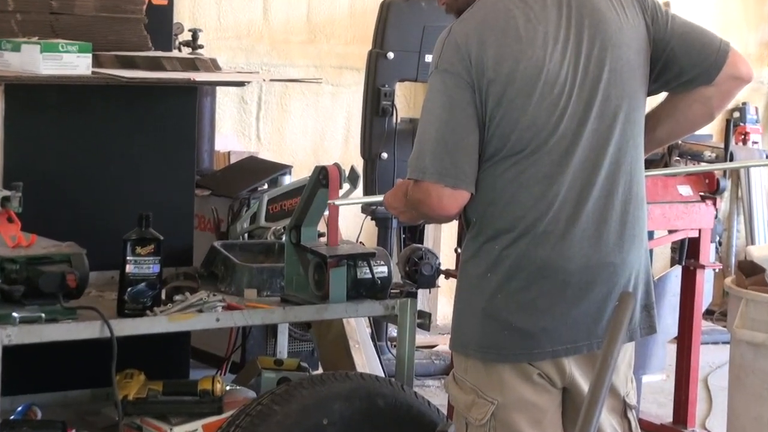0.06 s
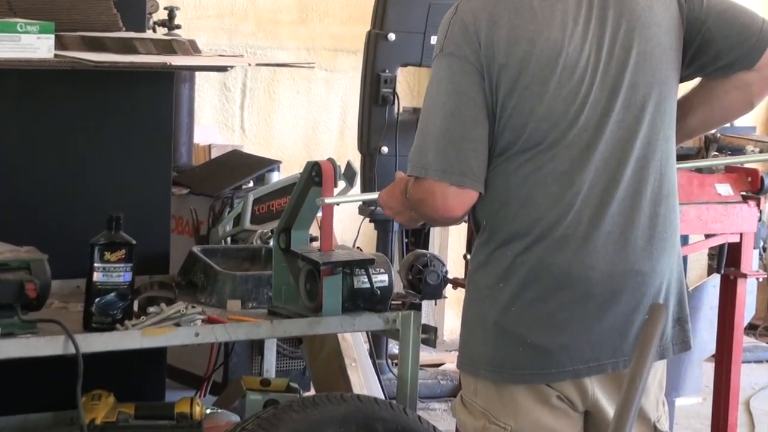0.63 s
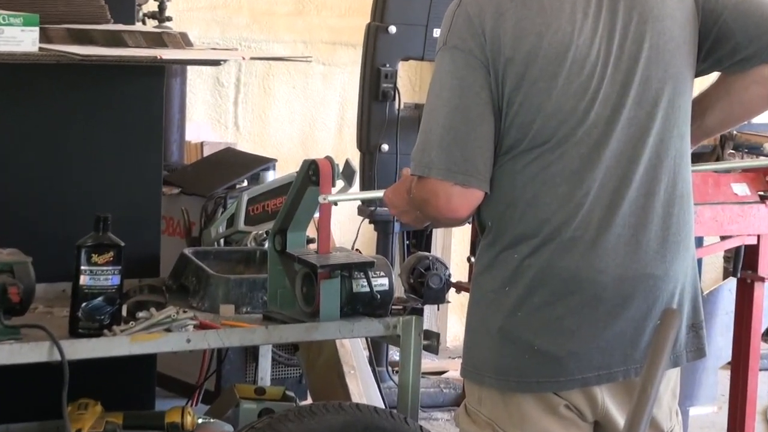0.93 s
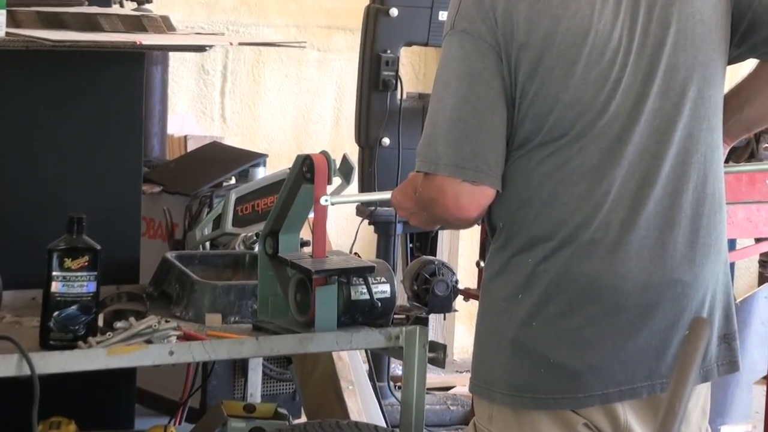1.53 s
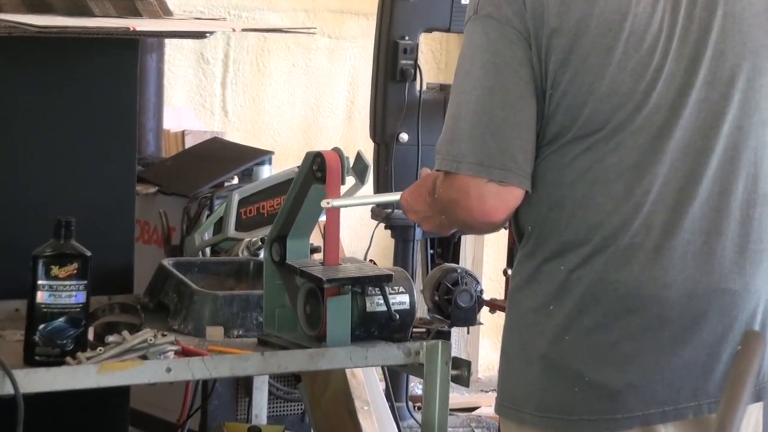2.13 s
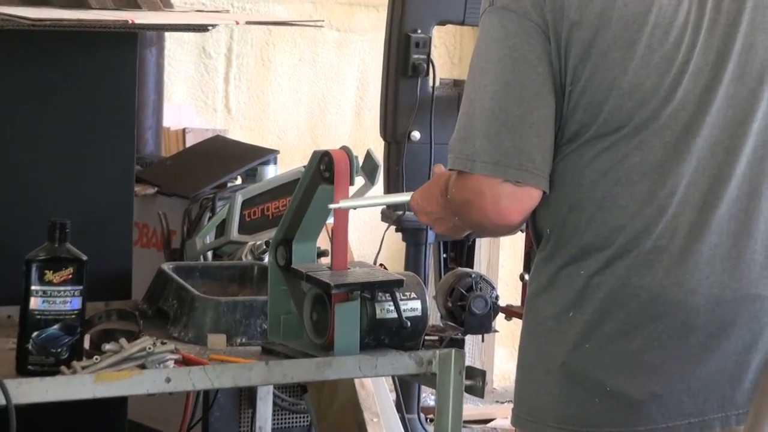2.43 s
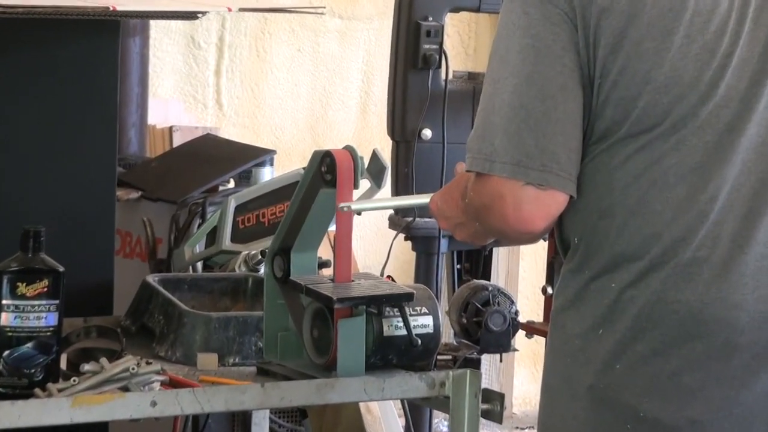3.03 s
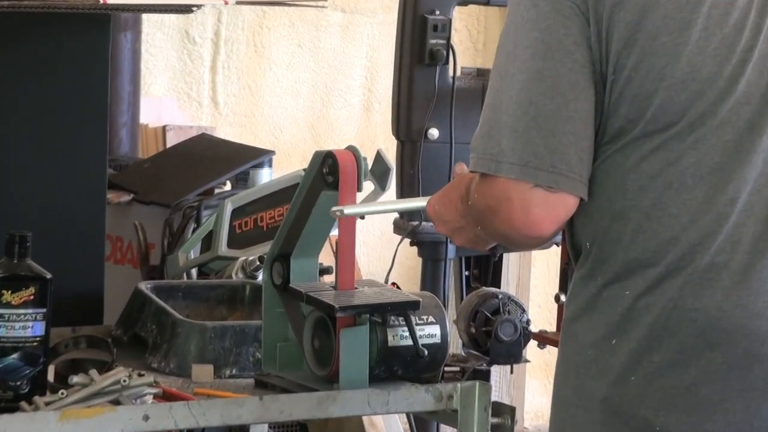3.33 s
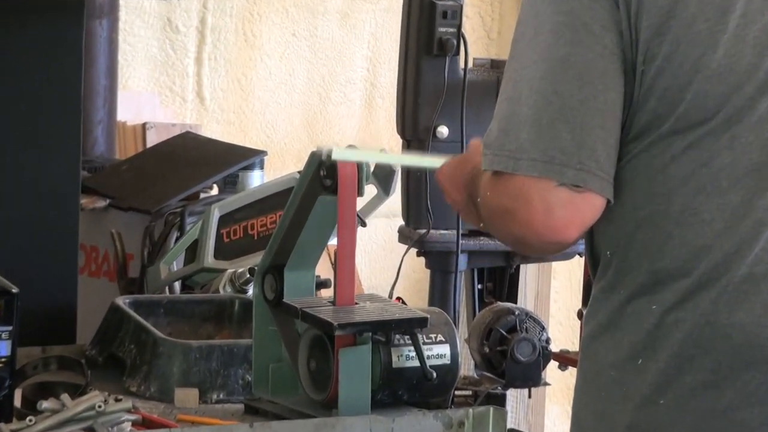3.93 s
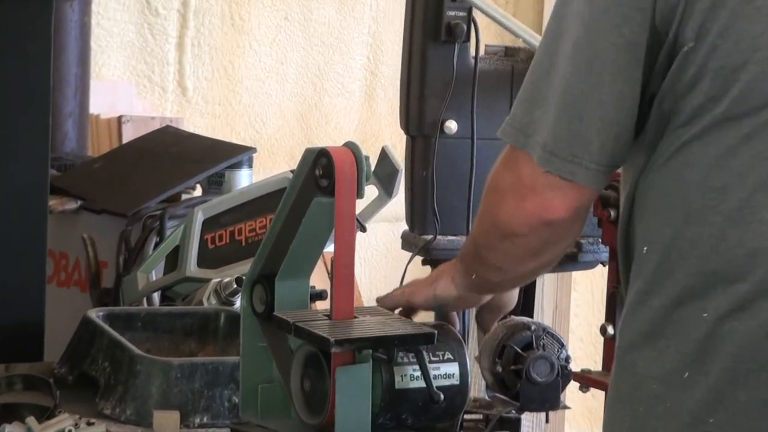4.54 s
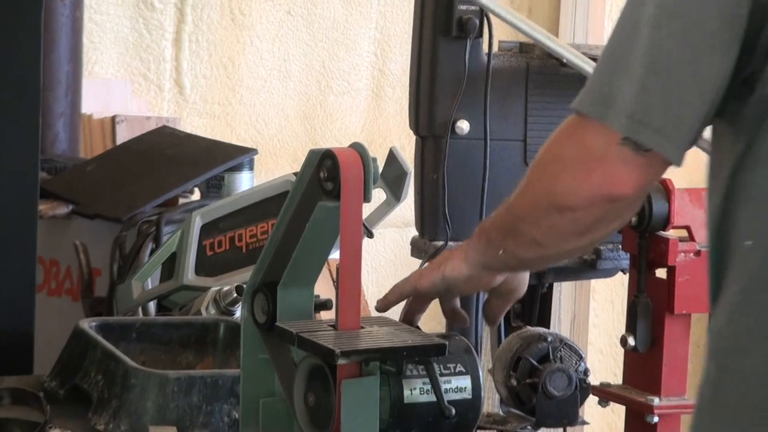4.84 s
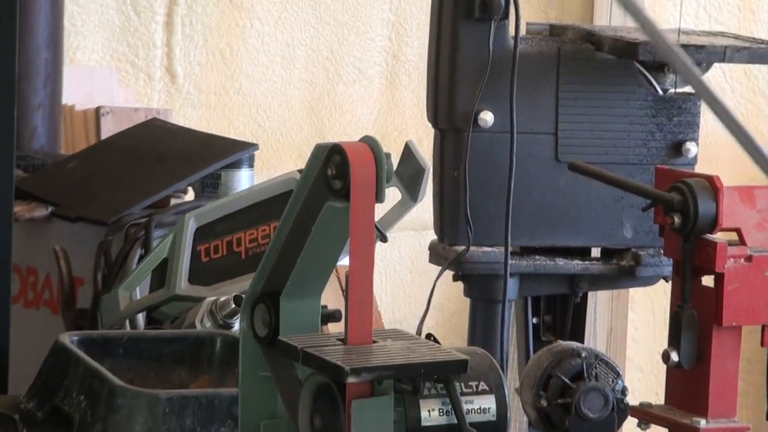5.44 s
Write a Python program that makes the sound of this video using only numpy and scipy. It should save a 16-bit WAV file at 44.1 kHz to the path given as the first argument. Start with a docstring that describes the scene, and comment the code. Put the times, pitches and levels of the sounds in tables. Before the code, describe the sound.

A small belt sander hums and rushes in a workshop while a metal rod is ground against it three times, hissing and squealing.

```python
"""A workshop, close to a small bench belt sander; a metal rod is pressed to the belt three times.
Behind it all, motor shaft and idler wheel hum; the belt rushes over its backing plate, shakes the
frame and rumbles with bumps that come round every loop. In front, grit cuts the rod with a bright
hiss that sets it ringing, and now and then it squeals on one mode or judders into a screech.
Sander and rod sit dead centre at the microphone, with a short room echo on the rod."""
import sys
import numpy as np
from scipy import signal
from scipy.fft import rfft, irfft
from scipy.io import wavfile

SR = 44100
rng = np.random.default_rng(int(sys.argv[2]) if len(sys.argv) > 2 else 0)


def dump(signal):
    """Clip the signal to [-1, 1] and save it as 16-bit WAV at the path in sys.argv[1]."""
    limited = np.clip(np.atleast_2d(signal).T, -1, 1)
    pcm = np.round(limited * 32767).astype(np.int16)
    wavfile.write(sys.argv[1], SR, pcm)


N = 250488
TIME = np.arange(N) / SR

SHAFT_HZ, IDLER_HZ, BELT_LOOP_S = 59.58, 110.7, .1175
# hum of the motor shaft and of the idler wheel: multiple_of_turning_rate, relative_level_db
SHAFT_HARMONICS = [(1, -82), (2, -79), (3, -66.5), (12, -57.5), (13, -54), (17, -53.5)]
IDLER_HARMONICS = [(1, -77.5), (2, -56), (3, -67), (4, -62.5), (5, -62), (6, -67)]

# the belt sliding on its plate, at the reference rush: frequency_hz, level_db_per_hz
SLIDE_SPECTRUM = [(25, -100), (60, -88), (110, -88), (160, -82.5), (205, -74.5), (300, -79), (500, -75.5),
                  (750, -72.5), (1050, -69.5), (1900, -68), (4300, -73), (6400, -74), (8700, -86),
                  (15500, -90.5)]
# how loudly the belt rushes; frame modes and hum follow it: time_s, level_db
RUSH_CURVE = [(0.0, -37), (0.12, -37), (0.5, -39.0), (0.7, -42.2), (1.0, -41.0), (1.48, -34), (1.72, -35.5),
              (2.2, -34.5), (2.65, -39.5), (2.82, -34.5), (3.2, -34.0), (4.1, -36), (4.82, -35), (5.2, -39),
              (5.5, -38), (5.68, -40)]
RUSH_REF_DB = -35.0
# how much of that swing each range takes: frequency_hz, share
SWING_SHARES = [(450, 1.12), (1400, 1.0), (3200, 0.71), (7000, 0.63)]
# the worker steps aside and no longer screens the belt from the microphone: frequency_hz, gain_db
UNSCREENED_COLOUR = [(450, 0.8), (1400, 0.2), (3200, 4.5), (7000, 0)]
# resonances of frame and backing plate: pitch_hz, width_hz, level_db
FRAME_RESONANCES = [(167.7, 5, -67), (531.4, 15, -59.5), (727, 7.8, -63), (913, 19, -51.5), (1002, 53, -47),
                    (1106, 32, -44.5), (1158, 32, -49), (1529, 82, -43.5), (1680, 115, -48),
                    (1977, 71, -54), (2344, 69, -48), (2470, 51, -51), (2681, 27, -45.5), (2712, 100, -50),
                    (3052, 86, -47.5), (3330, 44, -48.5), (3435, 35, -47), (3814, 42, -44.5),
                    (4510, 160, -43.5), (4804, 30, -50), (5740, 65, -51), (6210, 100, -48),
                    (7740, 110, -49.5), (9640, 520, -46), (11200, 540, -50), (13200, 500, -53.5)]
# frame and plate sing up for a moment: peak_s, pitch_hz, level_db, rise_s, fall_s
FRAME_SWELLS = [(2.22, 526, -44, .025, .28), (3.13, 530, -51, .08, .06), (4.3, 1545, -43, .1, .25),
                (4.58, 1152, -45, .12, .2), (5.38, 3830, -43, .1, .12)]

# the hand's pressure on the rod, one curve a press: time_s, grinding_level_db
PRESS_ONE = [(0, -29.5), (.17, -28.5), (.29, -34.5), (.5, -36.5), (.63, -43), (.85, -45), (1.0, -54)]
PRESS_TWO = [(1.0, -52), (1.07, -43), (1.35, -33.5), (1.52, -24.5), (1.76, -25), (2.0, -26), (2.12, -28),
             (2.43, -33.5), (2.63, -42.5)]
PRESS_THREE = [(2.67, -38), (2.78, -28), (3.02, -23.5), (3.12, -28.5), (3.3, -27.5), (3.52, -33.5),
               (3.69, -25.5), (3.83, -37), (4.05, -48)]
GRIND_HARD_DB = -26.5   # grinding level that counts as full pressure
# a sharp edge bites and sizzles: peak_s, treble_gain_db
SHARP_EDGES = [(.02, -0.5), (1.6, 0.9), (2.76, 0), (3.05, -0.5)]
# hiss of grit cutting metal: frequency_hz, relative_level_db_per_hz
HISS_SPECTRUM = [(800, -88), (1500, -77), (2200, -66), (3000, -72.5), (4000, -64.5), (6000, -65),
                 (7200, -64.5), (8700, -74.5), (10500, -72.5), (12500, -68.5), (14400, -83), (15700, -93)]
# resonances of the hand-held rod: pitch_hz, width_hz, relative_level_db
ROD_RESONANCES = [(2810, 40, -49), (3810, 60, -45), (4995, 45, -42.5), (5870, 90, -41), (6260, 60, -40),
                  (6965, 35, -42), (7680, 90, -42), (8350, 150, -45), (9115, 25, -50), (9580, 150, -43),
                  (9880, 30, -45), (10750, 60, -49), (11220, 90, -44), (11540, 60, -40), (12380, 30, -47),
                  (12650, 150, -46), (13190, 40, -48), (14030, 40, -45), (14450, 300, -44),
                  (15600, 100, -51)]
# the rod sticks and slips on one mode: peak_s, pitch_hz, level_db, rise_s, fall_s
ROD_SQUEALS = [(.06, 6955, -26, .035, .035), (.221, 14030, -37, .03, .03), (.42, 14030, -41, .02, .015),
               (1.06, 7690, -41, .012, .05), (1.444, 11540, -29, .008, .007), (1.487, 7690, -29, .03, .015),
               (1.477, 11540, -13.5, .002, .008), (1.58, 9580, -29, .02, .03),
               (1.656, 11540, -23, .035, .03), (1.722, 7700, -23.5, .008, .04),
               (1.965, 12565, -25, .05, .022), (2.122, 12560, -15, .021, .03),
               (2.822, 9875, -27, .02, .016), (2.949, 14025, -26, .01, .01), (3.092, 11540, -22, .01, .007),
               (3.144, 11540, -22, .013, .007)]
# the rod digs in and judders harshly: peak_s, pitch_hz, level_db
ROD_SCREECHES = [(2.91, 5900, -27), (2.947, 6230, -23), (2.963, 6600, -23.5), (3.012, 5900, -24),
                 (3.089, 5800, -27)]


def from_db(db):
    return 10 ** (np.asarray(db) / 20)


def rms_one(x):
    return x / np.sqrt(np.mean(x ** 2) + 1e-20)


def in_time(curve):
    """A curve's value at every sample."""
    return np.interp(TIME, *np.transpose(curve))


def at_hz(points, hz):
    """Reads a spectrum on a log-frequency axis."""
    frequencies, values = np.transpose(points)
    return np.interp(np.log(hz), np.log(frequencies), values)


def drift(rate_hz):
    """Smooth random wavering with a spread of about 1."""
    step, settle = 40, 2000
    pole = np.exp(-2 * np.pi * rate_hz * step / SR)
    noise = rng.standard_normal(N // step + settle + 2)
    slow = signal.lfilter([1], [1, -2 * pole, pole * pole], noise)[settle:]
    return np.interp(np.arange(N) / step, np.arange(len(slow)), rms_one(slow))


def resonate(x, hz, width_hz):
    """A resonance that turns white noise of rms 1 into a ring of rms 1."""
    r = np.exp(-np.pi * width_hz / SR)
    feedback = [1, -2 * r * np.cos(2 * np.pi * hz / SR), r * r]
    return signal.lfilter(np.sqrt((1 - r * r) / 2) * np.array([1, 0, -1]), feedback, x)


def bands(first, second):
    """Third-octave bands of two white sources in turn, at 0 dB per Hz; yields centre_hz, band."""
    edges = np.geomspace(25, 17000, 29)
    for k, (low, high) in enumerate(zip(edges, edges[1:])):
        sos = signal.butter(2, [low, high], "band", fs=SR, output="sos")
        yield np.sqrt(low * high), signal.sosfilt(sos, (first, second)[k % 2]) * np.sqrt(SR / 2)


def tone(hz, wander):
    """A sine of rms 1 whose frequency strays by the share wander."""
    return np.sqrt(2) * np.sin(2 * np.pi * (np.cumsum(hz * (1 + wander)) / SR + rng.random()))


def room_rumble(level_db=-78.5):
    """A faint low rumble, in opposite phase left and right."""
    sos = signal.butter(2, [45, 400], "band", fs=SR, output="sos")
    rumble = rms_one(signal.sosfilt(sos, rng.standard_normal(N)))
    return from_db(level_db) * rumble * np.array([[1], [-1]])


def room_echo(x, wet_db, t60_s=.25):
    """Benches and walls return a short, dense echo, 4 ms behind the direct sound."""
    t = TIME[:SR // 2]
    echo = rng.standard_normal(len(t)) * from_db(-60 * t / t60_s) * (t > .004)
    wet = signal.fftconvolve(x, echo / np.linalg.norm(echo))[:N]
    return (x + from_db(wet_db) * wet) / np.hypot(1, from_db(wet_db))


def hum(wander=.001603, waver_db=1.9, gain_db=3.5, fade_from_s=4.46, fade_db_per_s=7):
    """Unbalance of motor shaft and idler wheel; it swells with the belt and fades towards the end."""
    speed_drift = wander * drift(2.41)
    wheels = ((SHAFT_HZ, SHAFT_HARMONICS), (IDLER_HZ, IDLER_HARMONICS))
    tones = sum(tone(hz * multiple, speed_drift) * from_db(db + waver_db * drift(8.7))
                for hz, harmonics in wheels for multiple, db in harmonics)
    swell_db = .96 * (in_time(RUSH_CURVE) - RUSH_REF_DB)
    fade_db = fade_db_per_s * np.maximum(TIME - fade_from_s, 0)
    return tones * from_db(gain_db + swell_db - fade_db)


def wheel_tug(depth):
    """The belt is tugged once in every turn of the drive wheel."""
    return 1 + depth * np.sin(2 * np.pi * SHAFT_HZ * TIME)


def belt_surface(repeat_share=.48, repeat_below_hz=1330):
    """White roughness: coarse bumps come round with each loop of the belt, fine ones are always new."""
    loop = np.resize(rng.standard_normal(round(BELT_LOOP_S * SR)), N)
    fresh = rng.standard_normal(N)
    hz = np.arange(N // 2 + 1) * SR / N
    share = repeat_share / (1 + (hz / repeat_below_hz) ** 2)
    return irfft(np.sqrt(share) * rfft(loop) + np.sqrt(1 - share) * rfft(fresh), N)


def belt(flutter_db=1.32, ring_waver_db=.9, step_aside_s=(4.54, 5.32)):
    """The belt slides over its plate and shakes the frame; it brightens as the worker steps aside."""
    rush_db = in_time(RUSH_CURVE) - RUSH_REF_DB
    aside = np.interp(TIME, step_aside_s, [0, 1])

    def swell_db(hz):
        return at_hz(SWING_SHARES, hz) * rush_db + at_hz(UNSCREENED_COLOUR, hz) * aside

    slide = sum(band * from_db(at_hz(SLIDE_SPECTRUM, hz) + swell_db(hz) + flutter_db * drift(14.4))
                for hz, band in bands(belt_surface(), belt_surface()))
    frame = 0
    for hz, width, db in FRAME_RESONANCES:
        ring = resonate(rng.standard_normal(N), hz, width)
        frame += ring * from_db(db + swell_db(hz) + ring_waver_db * drift(2.9))
    return (slide + frame) * wheel_tug(depth=.068)


def friction_tones(rows, wander, rough_db, unrest_hz):
    """For each row a single mode builds up under friction, wavers and dies away."""
    out = np.zeros(N)
    stray, waver_db = wander * drift(unrest_hz), rough_db * drift(unrest_hz)
    for peak_s, hz, db, rise_s, fall_s in rows:
        near = slice(*np.searchsorted(TIME, [peak_s - 7 * rise_s, peak_s + 7 * fall_s]))
        t = TIME[near] - peak_s
        envelope = np.exp(-np.maximum(-t / rise_s, t / fall_s))
        out[near] += tone(hz, stray[near]) * envelope * from_db(db + waver_db[near])
    return out


def rod_contact(attack_db_per_s=31, dulling_db_per_s=11.5, dull_db=-8):
    """Grinding level and edge sizzle in dB: each bite brightens the hiss quickly, then wear dulls it."""
    level_db = in_time(PRESS_ONE + PRESS_TWO + PRESS_THREE)
    bites = [db - np.maximum((s - TIME) * attack_db_per_s, (TIME - s) * dulling_db_per_s)
             for s, db in SHARP_EDGES]
    return level_db, np.maximum(np.max(bites, axis=0), dull_db)


def chirps(tries_per_s=65, below_db=5.5, spread_db=10):
    """The edge sticks and slips briefly on a high mode of the rod, more often under hard pressure."""
    when, which, loudness, length, chance = rng.random((round(tries_per_s * N / SR), 5)).T
    high_modes = np.array([hz for hz, _, _ in ROD_RESONANCES if 6500 < hz < 15000])
    peak_s = when * N / SR
    hz = high_modes[(which * len(high_modes)).astype(int)]
    level_db, sizzle_db = rod_contact()
    edge_db = np.interp(peak_s, TIME, level_db + sizzle_db)
    db = edge_db - below_db + spread_db * (loudness - .5)
    fall_s = .006 + .016 * length
    sticks = chance < from_db(edge_db - GRIND_HARD_DB)
    rows = np.column_stack([peak_s, hz, db, .14 * fall_s, fall_s])[sticks]
    return friction_tones(rows, wander=.004, rough_db=2, unrest_hz=300)


def screeches(rise_s=.017, fall_s=.008):
    """The rod digs in and judders: short tones with a harsh, unsteady pitch."""
    rows = [(*row, rise_s, fall_s) for row in ROD_SCREECHES]
    return friction_tones(rows, wander=.0325, rough_db=1, unrest_hz=500)


def catches(per_s=28, size_db=14, fade_s=.005):
    """Now and then the edge catches: the drive jumps at once and fades within milliseconds."""
    jumps = (rng.random(N) < per_s / SR) * rng.random(N) * from_db(size_db)
    return 1 + signal.lfilter([1], [1, -np.exp(-1 / (fade_s * SR))], jumps + 1e-18)


def grit(per_s, spread_db):
    """Grains strike the rod at random, each with a size of its own; rms 1."""
    strikes = (rng.random(N) < per_s / SR) * rng.standard_normal(N)
    return rms_one(strikes * from_db(spread_db * rng.standard_normal(N)))


def grinding(chatter_db=.85, edge_chatter_db=2, patchy_db=.3, hiss_db=-1.3):
    """Grit tears at the bouncing rod; as the contact shifts, now one mode is fed and now another."""
    level_db, sizzle_db = rod_contact()
    pressure = np.minimum(from_db(level_db - GRIND_HARD_DB), 1)
    force = from_db(level_db - GRIND_HARD_DB + chatter_db * drift(23)) * wheel_tug(depth=.075)
    sizzle_db += edge_chatter_db * pressure * drift(40)

    def bite(hz):
        treble_share = np.clip(np.log2(hz / 6000), 0, 1.1)
        return force * from_db(sizzle_db * treble_share)

    grains = [grit(per_s=14000, spread_db=2) for _ in range(2)]
    hiss = sum(band * bite(hz) * from_db(at_hz(HISS_SPECTRUM, hz) + patchy_db * drift(32))
               for hz, band in bands(*grains) if hz > 700)
    strikes = grit(per_s=9000, spread_db=2.5)
    ring = 0
    for hz, width, db in ROD_RESONANCES:
        # high modes catch most strongly, and only under pressure
        drive = rms_one(catches() ** (pressure * hz / 11000))
        ring += resonate(strikes * drive * bite(hz) * from_db(db), hz, width)
    return from_db(hiss_db) * hiss + ring


def scene():
    """Sander and rod stand in the centre; only the faint room rumble differs between the sides."""
    squeals = friction_tones(ROD_SQUEALS, wander=.0012, rough_db=1.5, unrest_hz=90)
    edge_tones = chirps() + screeches()
    touching = np.interp(TIME, [3.85, 4.05], [1, 0])   # the rod leaves the belt
    rod = room_echo(touching * grinding() + edge_tones, wet_db=-12) + room_echo(squeals, wet_db=-22)
    frame_song = friction_tones(FRAME_SWELLS, wander=.004, rough_db=1.5, unrest_hz=60)
    sander = belt() + hum() + frame_song
    return room_rumble() + sander + rod


def record(dry, cutoff_hz=15680):
    """The microphone chain cuts the top steeply."""
    return signal.sosfilt(signal.ellip(12, .1, 80, cutoff_hz, fs=SR, output="sos"), dry)


dry = scene()
out = record(dry)
dump(out)
```